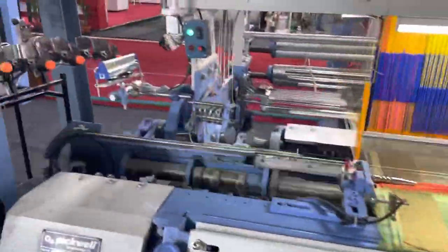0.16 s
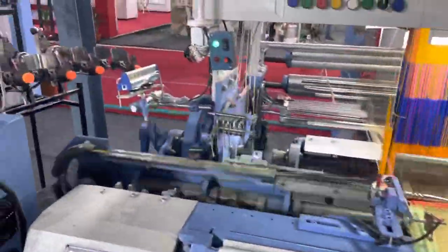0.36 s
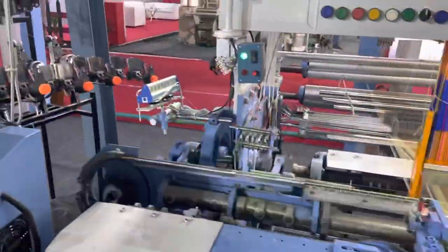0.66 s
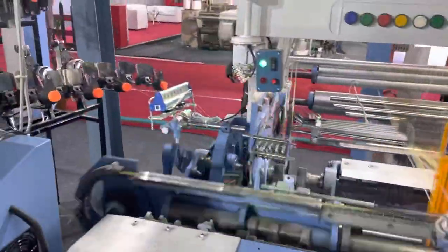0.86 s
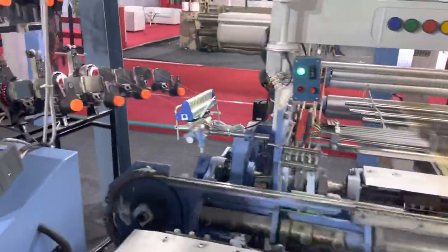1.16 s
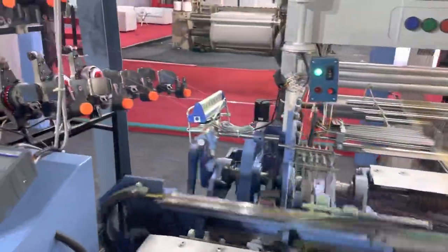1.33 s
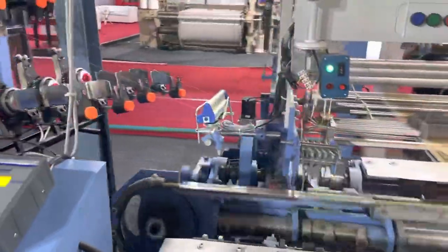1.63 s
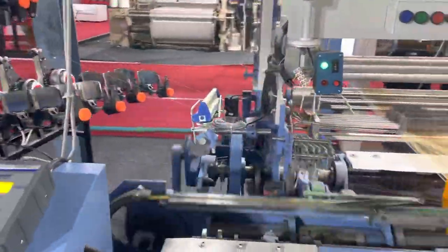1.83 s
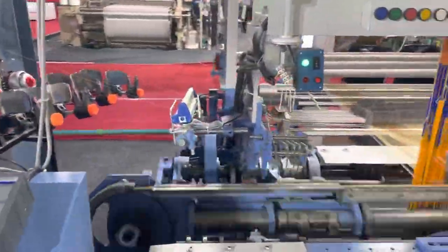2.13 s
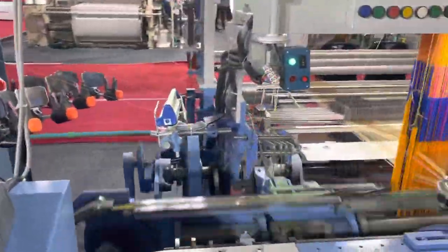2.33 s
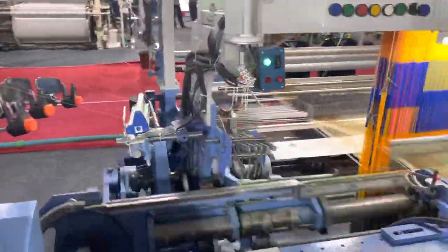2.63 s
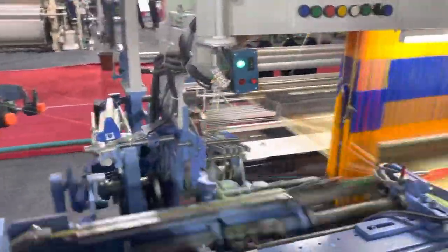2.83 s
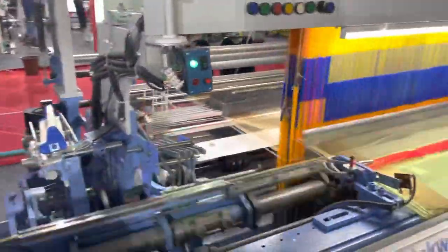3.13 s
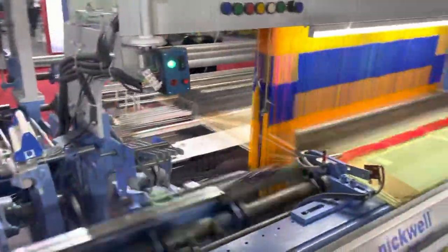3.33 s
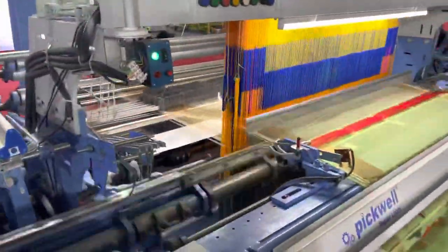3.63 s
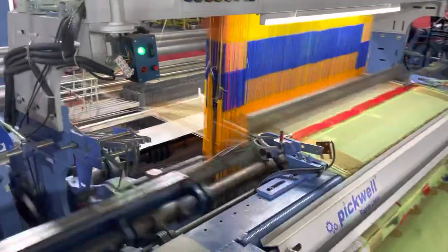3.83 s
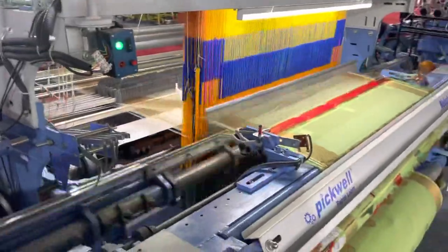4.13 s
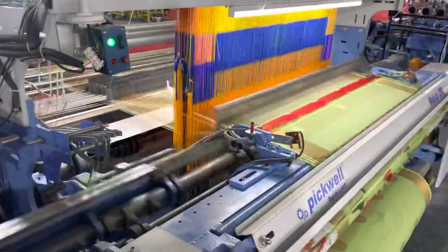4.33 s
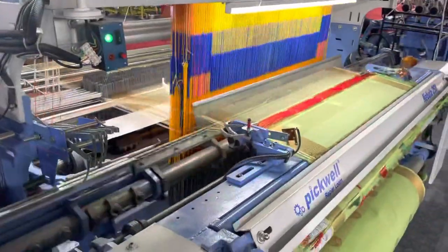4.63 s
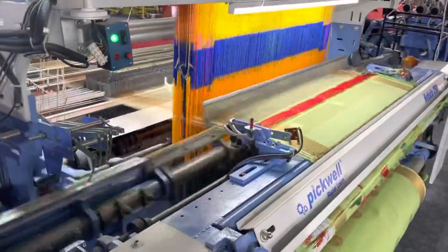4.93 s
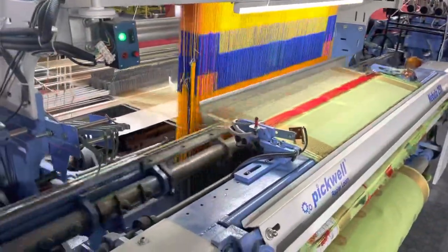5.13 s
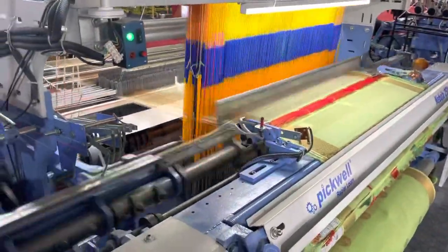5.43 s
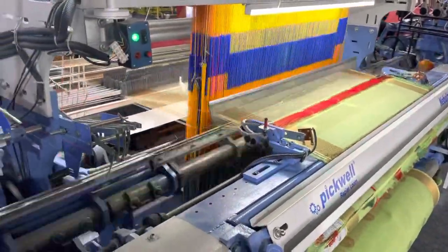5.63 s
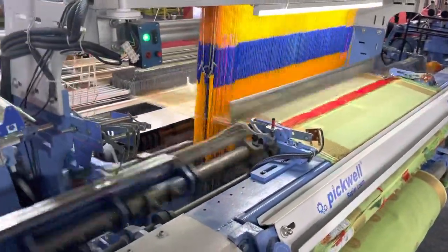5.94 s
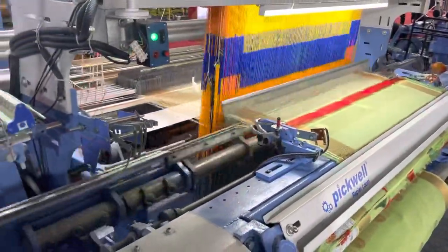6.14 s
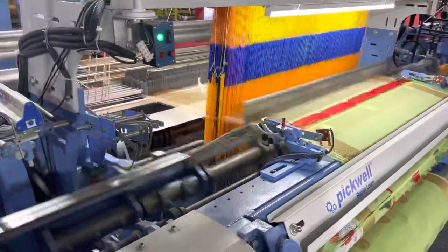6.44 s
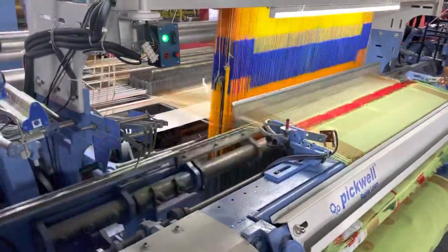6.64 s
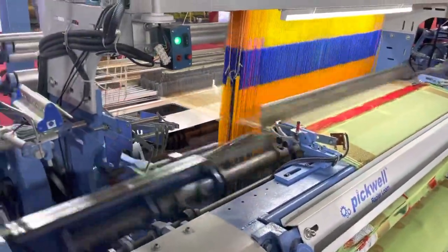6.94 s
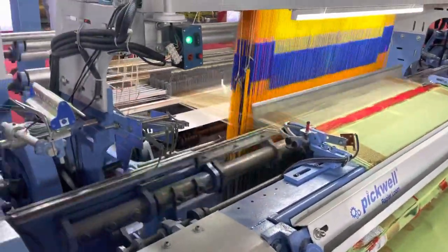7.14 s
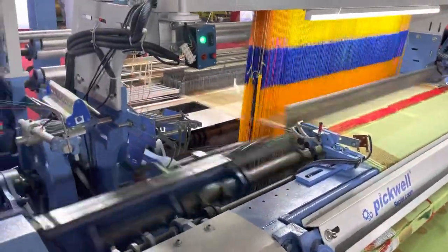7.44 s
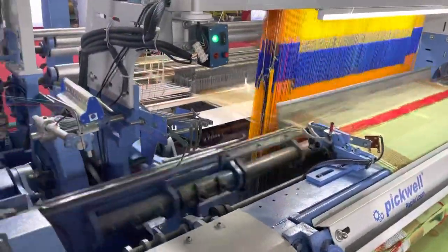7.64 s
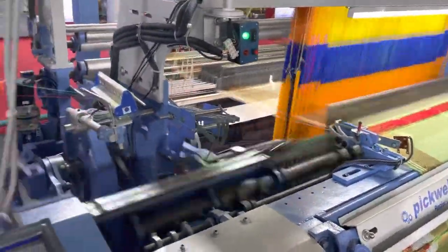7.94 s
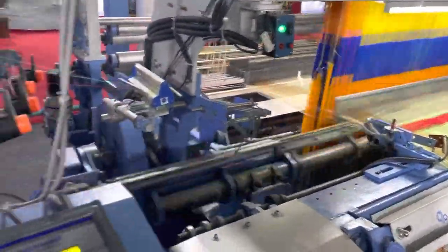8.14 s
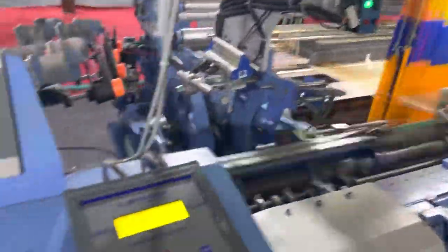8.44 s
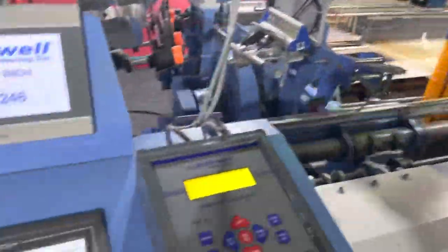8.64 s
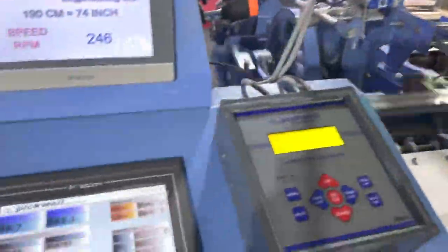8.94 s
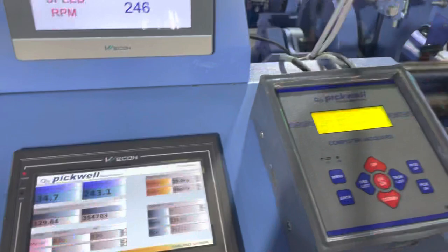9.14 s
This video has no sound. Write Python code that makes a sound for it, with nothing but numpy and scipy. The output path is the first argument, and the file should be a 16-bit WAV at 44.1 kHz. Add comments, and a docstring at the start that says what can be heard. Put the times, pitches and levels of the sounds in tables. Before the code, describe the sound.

Continuous weaving machinery in a loud industrial hall, heard close in stereo. A fast, even mechanical chug of rattling guides, chattering wires and hissing slides repeats four times a second, varying slightly in strength. Odd hard snaps, ticks and short metallic pings poke out. A low motor drone is strongest in the first couple of seconds, then fades under the rumble and roar as the listener moves along.

```python
"""Rapier loom in a weaving hall

A rapier loom weaves about four picks a second, heard from an arm's length. Each pick: rapier rattle (noise bursts
into guide modes), weft gripper snap, return swish. Knocks shape the frame's noise, excite the covers and chatter in
the healds; levers and accents are struck resonances; hum, drone, swells and surges are sines. Behind: the hall's roar.
"""
import sys
import numpy as np
from scipy import signal
from scipy.fft import rfft, irfft
from scipy.io import wavfile
from scipy.ndimage import uniform_filter1d

SR = 44100
rng = np.random.default_rng(int(sys.argv[2]) if len(sys.argv) > 2 else 0)


def master_out(mix):
    """Clip the mix to full scale and print it as 16-bit PCM to the path in sys.argv[1]."""
    frames = np.transpose(np.atleast_2d(mix))
    ceiling = np.clip(frames, -1, 1)
    pcm = np.round(ceiling * 32767).astype(np.int16)
    wavfile.write(sys.argv[1], SR, pcm)


N = 409062
TIME_S = np.arange(N) / SR

# listener's walk along the loom: t/s, rumble/dB, hall/dB, healds/dB (relative), hum/dB (relative),
# rapier return/dB, covers/dB
WALK = [(0, -25.5, -19, -0.5, 4, -38, -37), (1.5, -28, -19, -3.5, 5, -42, -30),
        (3, -23.5, -19, -2, -2, -39, -30), (4.5, -24, -19.5, -4.5, 2, -40, -28.5),
        (6, -24.5, -19.5, -3.5, -4, -40, -27), (7.598, -26.3, -19, -4, -6, -36, -29.5),
        (8.5, -24.5, -19, -4, -2, -40, -35), (9.28, -23.5, -20, -9, 5, -37, -32)]

# roar of the hall, spectrum: f/Hz, relative level/dB
HALL_SPECTRUM = [(28, -47), (45, -11), (70, -4.5), (175, -4.5), (280, -3.5), (530, -4.5), (600, -7),
                 (1150, -7), (1600, -11), (2200, -16.5), (3200, -21), (5200, -24.5), (6800, -27),
                 (8200, -34), (11000, -28), (13000, -34), (15500, -53)]
# shafts and panels that keep ringing: f/Hz, width/Hz, level/dB re roar
HALL_RINGS = [(325, 24, -19), (497, 22, -22), (795, 50, -24), (1000, 70, -26), (1265, 26, -17.5),
              (1720, 60, -27), (3095, 35, -30), (11690, 100, -38)]

# frame and floor, spectrum: f/Hz, relative level/dB
FRAME_SPECTRUM = [(28, -36), (36, -16), (46, -9), (62, -2), (95, -1.5), (150, -2.5), (200, -6), (300, -9.5),
                  (500, -9.5), (900, -20.5), (2500, -31.5), (8000, -53)]
# main shaft, one pick a turn
FIRST_PICK_S, PICK_S = 0.0262, 0.24746

# boxy sheet-metal covers: f/Hz, width/Hz, relative level/dB
COVER_MODES = [(352, 25, 0), (444, 53, -3.5), (484, 41, 3), (537, 28, -9), (795, 71, -3.5), (980, 72, -4),
               (1450, 100, -5), (1810, 390, -9), (2290, 640, -10)]

# levers and plates; the range is before a small random detuning
LEVER_RANGE_HZ = (560, 2700)
LEVER_STRIKES = 30  # per lever
LEVERS_DB, LEVER_WIDTH_HZ, LEVER_DB_PER_OCTAVE = -29, 13.7, -4

# healds and return swish, spectrum: f/Hz, relative level/dB
HEALD_SPECTRUM = [(1200, -21), (3200, -1), (6500, 4.5), (8300, 7.5), (10500, 8.5), (12500, -23),
                  (15500, -11)]
# heald motion within a turn: t/s, relative level/dB
SHED_MOTION = [(0, 3), (.045, 10.5), (.068, -26), (.11, 5), (.17, 8.5), (.2, 4), (.22, 10.5), (.25, 5)]

# hum: tones of the drive plus a mains line near 100 Hz: f/Hz, level/dB before the walk
HUM = [(60.7, -43), (80.9, -42), (99.7, -43), (119, -45), (128.5, -43.5), (141.6, -45), (149.6, -46)]
# motor drone, loud beside the listener: t/s, level/dB before a small trim
DRONE = [(0, -32), (.4, -25), (.85, -27), (1.05, -31), (1.35, -24.5), (1.85, -29), (2.1, -40), (2.4, -27),
         (3.1, -34), (4.5, -41), (7.6, -44), (9.28, -36)]
DRONE_HZ = 94.3

# picks, each of its own strength: start t/s, rapier hiss/dB, guide rattle/dB
PICKS = [(0.0262, 0.5, 3), (0.2734, 1, -3), (0.5211, -3, 1), (0.7683, 1.6, 1), (1.016, 1, -6),
         (1.2635, -2, 0.1), (1.511, 1, -3), (1.7584, 1.7, -3), (2.0059, 0, -3), (2.253, -4, 3),
         (2.5008, 0.5, 2.5), (2.7486, -1, 1), (2.9957, -3, -2), (3.2432, 0, 1), (3.4906, -3, 0.5),
         (3.7381, 0.5, 0), (3.9856, -1.4, -2.5), (4.233, 0, 0.6), (4.4805, -4, -2), (4.7279, 0, -1),
         (4.9754, -3, -4), (5.2229, 0.0, 1.8), (5.4703, -3, -10), (5.7178, -1, -3), (5.9652, 1, -4),
         (6.2127, 0, -3), (6.4602, -1.3, -3), (6.7076, 2, -8), (6.9551, -2, -2), (7.2025, -2, -4),
         (7.45, -1, 0.2), (7.697, -0.4, -1.5), (7.9449, -0.7, -2), (8.192, 1, 0.7), (8.4398, -4, 1),
         (8.6873, -0.6, -0.5), (8.9348, -4, -2), (9.182, 1.0, -4)]
# sliding parts on the way out: t after start/s, relative level/dB
STROKE_OUT = [(-.001, -20), (.004, 0), (.009, 3), (.016, 1), (.022, 1), (.03, -1), (.04, -1.5), (.05, -9),
              (.07, -24)]
# sliding parts on the way back: t after start/s, relative level/dB
STROKE_BACK = [(.076, -20), (.088, 3), (.098, 7.5), (.108, -4), (.13, -20)]
# guide teeth met by the rapier head: t after start/s, relative level/dB, level slope along the walk/(dB/s)
GUIDE_STRIKES = [(.003, -1, -0.7), (.0078, 1.5, -0.9), (.0115, -3.5, 0.55), (.015, 3.5, -0.32),
                 (.0187, 3.5, -0.4), (0.0246, -4, -.3), (.027, -8, -0.2)]
# steel rapier and guide ring: f/Hz, width/Hz, relative level/dB
GUIDE_MODES = [(1420, 240, -5.5), (2170, 300, -9), (2700, 260, -19.5), (3500, 560, -7.5),
               (4230, 460, -18.5), (5130, 540, -18), (6450, 500, -14), (9830, 480, -6.5)]
# rapier flight, spectrum: f/Hz, relative level/dB
RAPIER_SPECTRUM = [(1000, -21.5), (2400, 7), (3600, 10.5), (5000, 12.5), (7100, 8.5), (8100, 28.5),
                   (9200, -12), (11000, 10), (13000, 4.5), (15500, -19)]
RAPIER_DB, GUIDE_DB, RETURN_SPREAD_DB = -32.5, 2.5, -0.5
STRIKE_DB, STRIKE_SPREAD_DB, STRIKE_JITTER_S = 22.5, 1, 0.0003  # level ahead of RAPIER_DB
GUIDE_TOP_HZ = 6800  # rattle below, hiss above
RETURN_DRIFT_S_PER_S = -0.0011  # the swish creeps earlier in the turn

# small steel parts, spectrum: f/Hz, relative level/dB
GRIPPER_SPECTRUM = [(1500, -13), (3500, 4.5), (5500, -2), (8000, 9), (10000, -6), (12500, 2.5), (14000, -4),
                    (15500, -18)]
# hard gripper snaps: t/s, level/dB before the snap gain
HARD_SNAPS = [(.053, -24), (.064, -17), (.561, -22), (.805, -22), (1.044, -29), (1.053, -14), (2.288, -25),
              (2.307, -21), (2.537, -18), (3.276, -26), (4.019, -15), (4.267, -25.5), (5.257, -20),
              (5.503, -29), (6, -13.5)]
SNAP_AFTER_S, SNAP_JITTER_S = 0.024, 0.0005
SNAP_DB, SNAP_SPREAD_DB = -29, -2  # before the snap gain
SNAP_DRIFT_S_PER_S = -0.0006  # the snap creeps earlier in the turn

# brief low swells in the rumble: t/s, f/Hz, peak envelope/dB
SWELLS = [(0.138, 225, -14), (1.676, 96, -17), (2.332, 115, -19), (2.756, 95, -17), (3.473, 460, -17),
          (3.727, 246, -17), (4.022, 290, -23), (4.547, 484, -17.5), (5.350, 486, -18), (5.495, 250, -17),
          (5.75, 330, -19), (6.059, 143, -16), (6.95, 313, -13.5), (8.31, 295, -23), (8.541, 240, -14.5),
          (8.940, 219, -13), (9.214, 100, -16)]
SWELL_RISE_S = 0.0046

# brief pitched accents in the clatter: t/s, f/Hz, impulse level/dB
ACCENTS = [(.182, 3014, -9), (1.035, 3186, -9), (1.612, 1150, 0), (1.730, 2670, -4), (1.775, 2230, -5),
           (2.497, 2497, -11), (2.733, 2340, -7), (2.869, 861, 5), (2.907, 1110, 0), (3.714, 2153, -1),
           (3.968, 2239, -1), (4.007, 1450, 0), (4.313, 1000, 2), (5.786, 2583, -5), (5.87, 1260, -1),
           (6.548, 3100, -6), (6.92, 1050, 2), (7.329, 1636, -9), (8.512, 1200, 0)]
ACCENT_WIDTH_HZ, ACCENT_BURST_DB = 50, -6  # burst relative to impulse

# loose healds and thread guides: t/s, level/dB before the tick gain
TICKS = [(.183, -29), (.374, -22), (.761, -22), (.942, -20), (1.147, -22), (1.191, -32), (1.729, -26),
         (1.921, -26), (3.469, -22), (3.856, -25), (8.499, -25), (8.884, -23), (9.268, -22)]
# weft selector and chance ticks, levels before the tick gain
SELECTOR_AFTER_S, SELECTOR_DB, SELECTOR_FADE_DB_PER_S = 0.176, -25, 2
STRAY_DB, STRAY_SPREAD_DB = -25, 2.5

# rumble surges: t/s, f/Hz, peak envelope/dB
SURGES = [(2.35, 103.6, -28.5), (3.02, 63, -36), (3.35, 77, -28), (4.923, 326, -25), (5.364, 112, -26),
          (6.037, 149.4, -25), (6.269, 182.3, -31), (7.1, 152, -30), (7.152, 262.6, -28),
          (7.338, 157.4, -24), (8.2, 64, -26), (8.6, 139.5, -27), (8.824, 64, -26), (8.847, 157, -27),
          (9.172, 271, -29.5)]
SURGE_SIGMA_S = 0.071

# stereo image: f/Hz, coherence/1, phase lead of the right/rad
STEREO_IMAGE = [(100, .97, .04), (200, .86, .15), (330, .66, .35), (520, .34, 1), (850, .06, 1.8),
                (1300, .3, 2.7), (1950, .15, 2.4), (2300, .46, -.3), (3300, .24, -1.1), (4300, .44, -.5),
                (5300, .15, -.8), (5900, .3, 1.5), (7000, .33, 1.1), (7600, .85, 2.85), (8300, .99, 3.13),
                (9000, .99, 3.16), (9500, .92, 3.3), (11200, .64, 4.9), (12800, .98, 6.27)]
# left channel against right: f/Hz, level/dB
LEFT_LEAN = [(70, 1.2), (130, 1.5), (300, .3), (700, .9), (2000, .9), (3300, 2.3), (6500, 2), (8200, 0)]
TOP_HZ, DIP_HZ, DIP_SHARE = 15700, (5450, 5720), 0.45


def undb(db):
    """Decibels to amplitude gain."""
    return 10 ** (np.asarray(db) / 20)


def level(x, db):
    """Scale to an rms level."""
    return x * undb(db) / np.sqrt(np.mean(x ** 2))


def vary(values, spread):
    """Add normal scatter to each value."""
    return values + spread * rng.standard_normal(len(values))


def wander(rate_hz):
    """Smoothed random steps, spread near 1."""
    hold = int(SR / rate_hz)
    steps = np.repeat(rng.standard_normal(N // hold + 1), hold)
    return uniform_filter1d(steps, hold)[:N]


def impulses(times_s, sizes):
    """One sharp push at each time."""
    index = np.round(np.asarray(times_s) * SR).astype(int)
    inside = (index >= 0) & (index < N)
    return np.bincount(index[inside], np.asarray(sizes)[inside], N)


def contacts(rate_hz, spread_db):
    """Many tiny random impacts of uneven size, rms 1."""
    hit = rng.random(N) < rate_hz / SR
    size = undb(spread_db * np.clip(rng.standard_normal(N), -2, 2))
    return level(hit * size * rng.choice([-1, 1], N), 0)


def scatter(x, t60_s):
    """Impacts become two independent noises whose energy decays 60 dB in t60_s."""
    keep = np.exp(-2 * np.log(1000) / (t60_s * SR))
    energy = signal.lfilter([1 - keep], [1, -keep], x ** 2 + 1e-18)
    return np.sqrt(energy) * rng.standard_normal((2, N))


def over_hz(points, size=N):
    """Interpolate (f/Hz, value) over log frequency onto transform bins."""
    hz, value = np.transpose(points)
    bins_hz = np.arange(size // 2 + 1) * SR / size
    return np.interp(np.log(bins_hz + 1), np.log(hz), value)


def colour(x, points, size=8192):
    """Minimum-phase filter of unit energy with the given spectrum."""
    cepstrum = irfft(np.log(undb(over_hz(points, size))))
    # fold onto positive time: causal response
    cepstrum[1:size // 2] *= 2
    cepstrum[size // 2 + 1:] = 0
    response = irfft(np.exp(rfft(cepstrum)))
    response /= np.linalg.norm(response)
    return signal.fftconvolve(x, response[None], axes=1)[:, :N]


def resonate(x, hz, width_hz):
    """Two-pole resonance of about unit energy."""
    b, a = signal.iirpeak(hz, hz / width_hz, fs=SR)
    return signal.lfilter(b, a, x) * np.sqrt(SR / (np.pi * width_hz))


def strokes(starts_s, dbs, shape):
    """Sum one motion envelope per pick, each at its own level."""
    t, db = np.transpose(shape)
    out = np.zeros(N)
    for start_s, size_db in zip(starts_s, dbs):
        out += np.interp(TIME_S - start_s, t, undb(db + size_db), left=0, right=0)
    return out


def snaps(times_s, dbs, gain_db, bounce_s, bounce, t60_s):
    """Small steel parts hit, bounce once and die away as coloured noise."""
    sizes = undb(dbs + gain_db)
    lag_s = bounce_s * (0.5 + rng.random(len(times_s)))
    blows = impulses(times_s, sizes) + impulses(times_s + lag_s, bounce * sizes)
    return colour(scatter(blows, t60_s), GRIPPER_SPECTRUM)


def hall():
    """Blows of the other looms merge into a roar of rms 1; ringing shafts and panels are added."""
    blows = scatter(contacts(rate_hz=1200, spread_db=1.5), t60_s=0.037)
    reverberation = rng.standard_normal((2, N))
    rings = np.zeros((2, N))
    for hz, width_hz, db in HALL_RINGS:
        rings += undb(db) * resonate(rng.standard_normal((2, N)), hz, width_hz)
    return level(colour(0.74 * blows + reverberation, HALL_SPECTRUM), 0) + rings


def frame(starts_s, count=36):
    """Cams and sley knock the frame at the same angles of each turn over floor rumble; rms 1."""
    turns_s = FIRST_PICK_S + PICK_S * np.arange(-1, len(starts_s))
    angles = (np.arange(count) + rng.random(count)) / count
    times_s = turns_s[:, None] + PICK_S * angles
    sizes = rng.choice([-1, 1], count) * undb(1.4 * rng.standard_normal(times_s.shape))
    shake = rng.standard_normal((2, N))
    shake[0] += level(impulses(times_s.ravel(), sizes.ravel()), -5.5)  # row 0: shared by both channels
    return level(colour(shake, FRAME_SPECTRUM), 0)


def covers():
    """Uneven drive knocks boom in sheet-metal modes of wandering level; rms 1."""
    knocks = scatter(contacts(rate_hz=110, spread_db=-0.5), t60_s=0.057)
    boom = np.zeros((2, N))
    for hz, width_hz, db in COVER_MODES:
        boom += resonate(knocks, hz, width_hz) * undb(db + 2.7 * wander(8))
    return level(boom, 0)


def levers(count=40):
    """Levers and plates, each of its own pitch, are struck at random moments and ring briefly."""
    pitches_hz = np.geomspace(*LEVER_RANGE_HZ, count) * (1 + 0.0202 * rng.standard_normal(count))
    out = np.zeros((2, N))
    for hz in pitches_hz:
        times_s = rng.random(LEVER_STRIKES) * N / SR
        strikes = impulses(times_s, vary(np.ones(LEVER_STRIKES), 0.19))
        ring = resonate(strikes, hz, LEVER_WIDTH_HZ)
        gain = undb(LEVER_DB_PER_OCTAVE * np.log2(hz / pitches_hz[0]))
        place = 2 * np.pi * rng.random()
        out += np.outer([np.cos(place), np.sin(place)], ring * gain)
    return level(out, LEVERS_DB)


def healds():
    """Wires jostle while the shed changes and rest while it stands open; rms -35 dB."""
    motion_db = np.interp((TIME_S - FIRST_PICK_S) % PICK_S, *np.transpose(SHED_MOTION))
    chatter = contacts(rate_hz=600, spread_db=2.5) * undb(motion_db + 1.1 * wander(30))
    return level(colour(scatter(chatter, t60_s=0.034), HEALD_SPECTRUM), -35.0)


def hum():
    """Hum sines, the drive's and one of the mains near 100 Hz, waver in level and phase, modelled as slow
    chance."""
    out = np.zeros(N)
    for hz, db in HUM:
        swell = 1 + 0.18 * wander(2.74)
        phase = 2 * np.pi * (hz * TIME_S + rng.random()) + 0.43 * wander(2.17)
        out += undb(db) * swell * np.sin(phase)
    return out


def drone():
    """The motor's low sine wavers in level and phase with the load, modelled as chance."""
    drone_db = np.interp(TIME_S, *np.transpose(DRONE)) - 0.5 + 1.7 * wander(9)
    return undb(drone_db) * np.sin(2 * np.pi * DRONE_HZ * TIME_S + 0.7 * wander(6))


def rapier(starts_s, back_db):
    """The head rubs along its guide, strikes the same teeth each pick, then slides back more smoothly."""
    pick_s, hiss_db, rattle_db = np.transpose(PICKS)
    blows = np.zeros(N)
    for after_s, db, slope_db_per_s in GUIDE_STRIKES:
        times_s = vary(starts_s + after_s, STRIKE_JITTER_S)
        strike_db = vary(STRIKE_DB + db + slope_db_per_s * starts_s, STRIKE_SPREAD_DB)
        blows += impulses(times_s, undb(strike_db))
    rub = scatter(contacts(rate_hz=2500, spread_db=-4.0), t60_s=0.008)
    rub *= strokes(starts_s, np.zeros(len(starts_s)), STROKE_OUT)
    out = (rub + scatter(blows, t60_s=0.013)) * undb(RAPIER_DB)

    # strokes favour different modes
    ring = np.zeros((2, N))
    for hz, width_hz, db in GUIDE_MODES:
        ring += resonate(out, hz, width_hz) * undb(db + 0.8 * wander(7.1))
    flight = colour(out, RAPIER_SPECTRUM) + ring * undb(GUIDE_DB)

    lowpass = signal.butter(2, GUIDE_TOP_HZ, fs=SR, output="sos")
    rattle = signal.sosfiltfilt(lowpass, flight)
    hiss = flight - rattle
    rattle_gain = undb(np.interp(TIME_S, pick_s, rattle_db))
    hiss_gain = undb(np.interp(TIME_S, pick_s, hiss_db))
    flight = rattle * rattle_gain + hiss * hiss_gain

    returns_s = starts_s + RETURN_DRIFT_S_PER_S * (starts_s - starts_s.mean())
    slide = contacts(rate_hz=3700, spread_db=-8.0) * strokes(returns_s, back_db, STROKE_BACK)
    return flight + colour(scatter(slide, t60_s=0.016), HEALD_SPECTRUM)


def gripper(starts_s):
    """The gripper snaps on the weft near one angle of every turn, now and then much harder."""
    times_s = vary(starts_s + SNAP_AFTER_S + SNAP_DRIFT_S_PER_S * starts_s, SNAP_JITTER_S)
    dbs = vary(np.full(len(starts_s), SNAP_DB), SNAP_SPREAD_DB)
    usual = np.transpose([times_s, dbs])
    times_s, dbs = np.vstack([usual, HARD_SNAPS]).T
    return snaps(times_s, dbs, gain_db=12.0, bounce_s=0.002, bounce=0.6, t60_s=0.005)


def swells():
    """Brief low swells in the rumble: short sines that rise and die at once."""
    out = np.zeros(N)
    for s, hz, db in SWELLS:
        age = np.maximum(TIME_S - s, 0) / SWELL_RISE_S
        out += undb(db) * age * np.exp(1 - age) * np.sin(2 * np.pi * hz * (TIME_S - s))
    return out


def accents():
    """Brief pitched accents in the clatter: a short noise burst and a ring."""
    out = np.zeros((2, N))
    for s, hz, db in ACCENTS:
        sign = np.array([[1], [rng.choice([-1, 1])]])
        out += resonate(impulses([s], [undb(db)]), hz, ACCENT_WIDTH_HZ) * sign
    s, _, db = np.transpose(ACCENTS)
    burst = scatter(impulses(s, undb(db + ACCENT_BURST_DB)), t60_s=0.03)
    return out + resonate(burst, hz=1900, width_hz=2400)


def ticks(starts_s, count=12):
    """The weft selector ticks once a turn and fades with distance; loose parts tick at odd moments."""
    selector_db = SELECTOR_DB - SELECTOR_FADE_DB_PER_S * starts_s
    selector = np.transpose([starts_s + SELECTOR_AFTER_S, selector_db])
    stray_db = vary(np.full(count, STRAY_DB), STRAY_SPREAD_DB)
    stray = np.transpose([rng.random(count) * N / SR, stray_db])
    times_s, dbs = np.vstack([selector, stray, TICKS]).T
    return snaps(times_s, dbs, gain_db=17.5, bounce_s=0.0042, bounce=0.89, t60_s=0.038)


def surges():
    """The rumble gathers at one pitch for a moment: sines under Gaussian envelopes."""
    out = np.zeros(N)
    for s, hz, db in SURGES:
        envelope = np.exp(-0.5 * ((TIME_S - s) / SURGE_SIGMA_S) ** 2)
        out += undb(db) * envelope * np.sin(2 * np.pi * (hz * TIME_S + rng.random()))
    return out


def stereo_image(field):
    """Set coherence and phase by frequency: opposed near 8.5 kHz, alike at the top."""
    table = np.array(STEREO_IMAGE)
    alike, phase_rad = over_hz(table[:, :2]), over_hz(table[:, ::2])
    mid, side = rfft(field) * np.sqrt([(1 + alike) / 2, (1 - alike) / 2])
    lean = undb(over_hz(LEFT_LEAN) / 2)
    left = (mid + side) * lean
    right = (mid - side) / lean * np.exp(1j * phase_rad)
    return irfft([left, right], N)


def scene():
    """The near loom, driven by one shaft, in front of the hall."""
    starts_s = np.array(PICKS)[:, 0]
    s, *columns = np.transpose(WALK)
    rumble_db, hall_db, healds_db, hum_db, back_db, covers_db = (np.interp(TIME_S, s, c) for c in columns)
    return_db = vary(np.interp(starts_s, TIME_S, back_db), RETURN_SPREAD_DB)
    clatter = rapier(starts_s, return_db) + gripper(starts_s) + ticks(starts_s) + healds() * undb(healds_db)
    body = frame(starts_s) * undb(rumble_db) + covers() * undb(covers_db) + levers() + accents()
    bass = swells() + surges() + drone() + hum() * undb(hum_db)  # same in both channels
    return stereo_image(clatter + body + hall() * undb(hall_db)) + bass


def record(dry):
    """A narrow partial dip near 5.6 kHz and a steep top cut."""
    dip = signal.sosfilt(signal.butter(1, DIP_HZ, "bandpass", fs=SR, output="sos"), dry)
    top_cut = signal.ellip(10, 0.1, 80, TOP_HZ, fs=SR, output="sos")
    return signal.sosfilt(top_cut, dry - DIP_SHARE * dip)


dry = scene()
out = record(dry)
master_out(out)
```